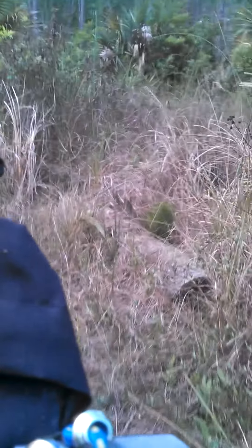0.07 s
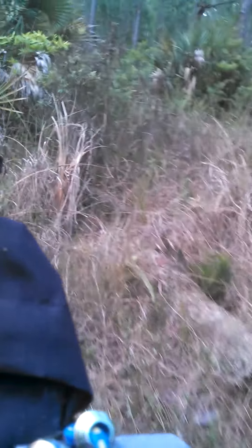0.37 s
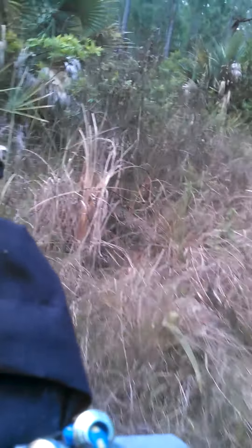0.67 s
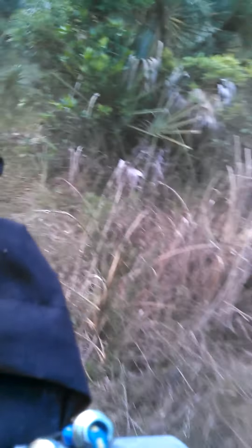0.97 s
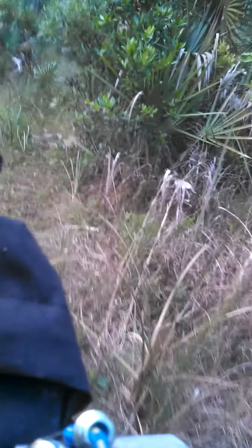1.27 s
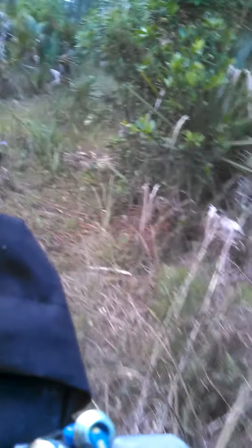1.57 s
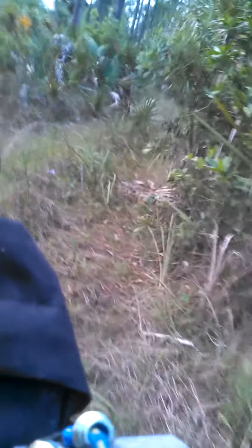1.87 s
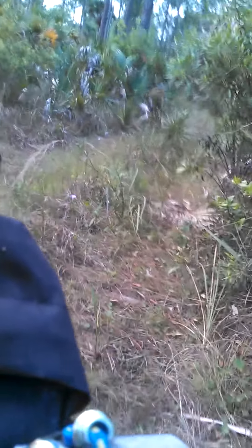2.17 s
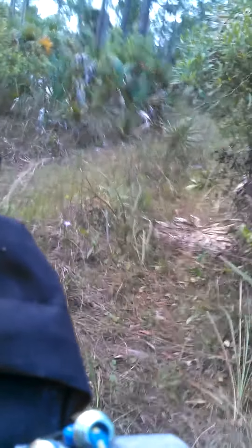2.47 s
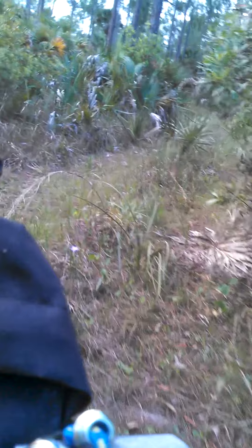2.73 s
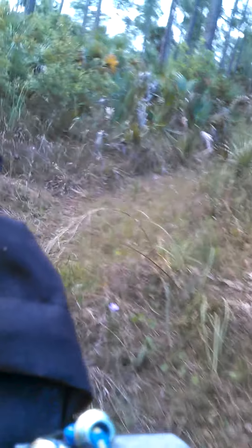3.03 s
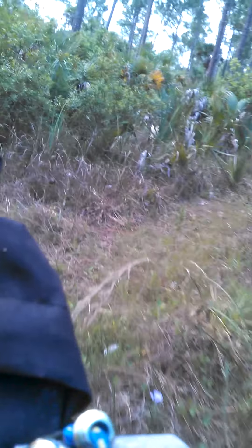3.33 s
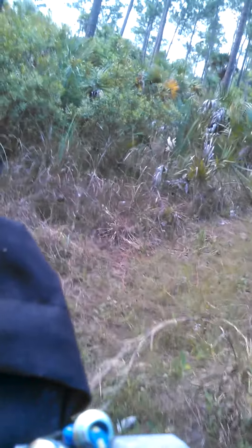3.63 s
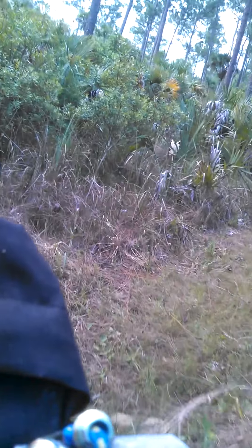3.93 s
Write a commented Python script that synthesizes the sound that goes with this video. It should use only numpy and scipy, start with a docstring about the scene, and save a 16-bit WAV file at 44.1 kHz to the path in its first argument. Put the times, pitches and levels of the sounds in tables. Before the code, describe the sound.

Bicycle freewheel ticking steadily over a bumpy, grassy trail as gusts buffet the microphone.

```python
"""A bicycle coasts along a trail of dry grass, heard from the rider's seat.
From the start the freewheel ticks, stalks swish and snap, the tyres crunch and the recorder whines faintly.
After one second the bike jolts over a bump and a strong gust thumps one of two close microphones;
the recorder turns everything down, then slowly back up. Near two seconds more bumps knock the bike,
which gives a brief hollow groan. It then ticks on to the end through lighter knocks and gusts."""
import sys
import numpy as np
from scipy import signal
from scipy.fft import rfft, irfft
from scipy.io import wavfile
from scipy.ndimage import uniform_filter1d

SR = 44100
rng = np.random.default_rng(int(sys.argv[2]) if len(sys.argv) > 2 else 0)


def wav_record(signal):
    """Record a signal, one row per channel, as 16-bit PCM in the file named by sys.argv[1]."""
    frames = np.transpose(np.atleast_2d(signal))
    bounded = np.clip(frames, -1, 1)
    # unit amplitude maps onto the largest positive 16-bit level
    quanta = np.round(bounded * 32767).astype(np.int16)
    wavfile.write(sys.argv[1], SR, quanta)


N = 176400
T = np.arange(N) / SR


def amp(db):
    """Turn decibels into a number to multiply by."""
    return 10 ** (np.asarray(db) / 20)


def unit(x):
    """Scale a signal to an average power of one."""
    return x / np.sqrt(np.mean(x ** 2))


def curve(rows):
    """Strength over time, joining rows of time_s, level_db."""
    return amp(np.interp(T, *np.array(rows).T))


def swells(rows):
    """Power over time of smooth rises and falls."""
    return sum(amp(db) ** 2 * np.exp(-2 * ((T - s) / (length / 2)) ** 2) for s, length, db in rows)


def colour(x, points):
    """Shape the tone by rows of pitch_hz, level_db; white noise keeps its overall power."""
    hz, db = np.array(points).T
    bin_hz = np.maximum(np.fft.rfftfreq(N, 1 / SR), 1)
    gains = unit(amp(np.interp(np.log(bin_hz), np.log(hz), db)))
    cepstrum = irfft(np.log(gains), N)
    cepstrum[1:N // 2] *= 2  # folded so the filter rings only after a hit, never before
    cepstrum[N // 2 + 1:] = 0
    response = irfft(np.exp(rfft(cepstrum)), N)[:SR // 10]
    return signal.fftconvolve(np.atleast_2d(x), response[None], axes=-1)[:, :N]


def delay(x, s):
    """Make a sound arrive s seconds later."""
    return irfft(rfft(x) * np.exp(-2j * np.pi * np.fft.rfftfreq(N, 1 / SR) * s), N)


def walk(per_s):
    """A wandering line through per_s random values each second."""
    return np.interp(T * per_s, np.arange(N // 100), rng.standard_normal(N // 100))


def grains(per_s, spread_db):
    """Two channels of tiny breaks at shared random moments, uneven in size."""
    happens = rng.random(N) < per_s / SR
    size = happens * amp(spread_db * np.minimum(rng.exponential(size=N), 4))
    return unit(size * rng.standard_normal((2, N)))


def blows(rows, attack_s, decay_s, ring_db, ring_s):
    """Strength over time of a series of hits: quick rise, short crack, weaker ring."""
    out = np.zeros(N)
    for s, db in rows:
        start = max(int(s * SR), 0)
        age = T[:min(SR // 8, N - start)]
        rise = 1 - np.exp(-age / attack_s)
        fall = np.exp(-age / decay_s) + amp(ring_db) * np.exp(-age / ring_s)
        out[start:start + len(age)] += amp(db) * rise * fall
    return out


def patchy(x, spread_db, size):
    """Add brief ringing at random pitches, so that no two contacts sound alike."""
    bins = signal.stft(x, nperseg=size)[2]
    chance = rng.standard_normal(bins.shape[1:])
    across_pitch = uniform_filter1d(chance, size=2, axis=0)
    patches = unit(uniform_filter1d(across_pitch, size=6, axis=1))
    gains = amp(spread_db * np.tanh(patches / 2) * 2)
    return unit(signal.istft(bins * gains)[1][:, :N])


def whine():
    """The recorder's electronics give thin, high tones that flutter a little."""
    # electronic tones: pitch_hz, level_db
    tones = [(12297, -44), (15000, -67)]
    flutter_db = 1.74 * walk(per_s=24.72)
    return amp(flutter_db) * sum(amp(db) * np.sqrt(2) * np.sin(2 * np.pi * hz * T) for hz, db in tones)


def wind():
    """Gusts thump on the right microphone; strong ones shed smaller, brighter whirls of air."""
    # gusts: centre_s, length_s, level_db
    gusts = [(0.128, 0.1, -22.5), (0.317, 0.018, -15), (0.541, 0.053, -12.5), (0.6, 0.039, -12.5),
             (0.694, 0.012, -15.5), (0.756, 0.044, -10), (.808, 0.051, -11.5), (.846, 0.027, -11.5),
             (0.892, 0.025, -6.5), (0.977, 0.032, -4.5), (1.025, 0.026, 8), (1.222, 0.059, -11),
             (1.283, 0.021, -6.5), (1.365, 0.045, -1), (1.505, 0.019, -6), (1.568, 0.068, -8),
             (1.692, 0.042, -8.5), (1.806, 0.011, -0.5), (1.89, 0.026, -12), (2.085, 0.071, -5.5),
             (2.18, 0.043, -2), (2.24, 0.043, -5.5), (2.385, 0.072, -7.5), (2.457, 0.019, -5),
             (2.54, 0.056, -11), (2.615, 0.033, -7), (2.731, 0.046, -10), (2.844, 0.082, -10),
             (2.915, 0.026, -9), (2.99, 0.037, -12), (3.042, 0.036, -6.5), (3.178, 0.02, -6),
             (3.29, 0.099, -14.5), (3.362, 0.042, -11), (3.467, 0.098, -11.5), (3.622, 0.022, -13.5),
             (3.694, 0.025, -10.5), (3.995, 0.015, -12.5)]
    # steady flow under the gusts: time_s, level_db
    airflow = [(0, -32.5), (.42, -39), (.95, -19.5), (1.15, -21), (1.75, -28), (2.03, -18.5), (2.3, -24.5),
               (2.68, -32), (3.0, -25), (3.45, -32.5), (4, -28)]
    # tone of the deep rumble: pitch_hz, level_db
    rumble_tone = [(25, -24.5), (50, -0.5), (70, 3.5), (110, -0.5), (165, -9), (230, -20), (330, -36.5),
                   (600, -51.5), (1500, -75)]
    # tone of the small whirls: pitch_hz, level_db
    whirl_tone = [(60, -30.5), (150, 7.5), (220, 4), (320, -7.5), (500, -19.5), (1000, -34.5), (3000, -45)]
    force = np.sqrt((amp(5.5) * curve(airflow)) ** 2 + swells(gusts))
    rumble = colour(rng.standard_normal(N), rumble_tone)[0]
    rumble = unit(rumble / np.sqrt(uniform_filter1d(rumble ** 2, size=600) + .02))  # even out its level
    whirls = colour(rng.standard_normal(N), whirl_tone)[0]
    air = amp(-1) * force * rumble + amp(-9) * force ** 1.69 * whirls
    low_cut = signal.butter(2, 36, "high", fs=SR, output="sos")
    return np.array([np.zeros(N), signal.sosfilt(low_cut, air)])


def grass():
    """Dry blades brush past in a fine hiss with bunches of crackles; now and then a stalk snaps."""
    # grass brushing wheels and frame: time_s, level_db
    brushing = [(0, -36.5), (.09, -42.5), (.13, -31), (.17, -42), (.33, -40.5), (.46, -35), (.57, -42),
                (.7, -44.5), (.8, -41.5), (.88, -39.5), (.94, -34.5), (1.02, -38.5), (1.3, -44.5),
                (1.65, -37), (1.8, -41), (1.98, -33.5), (2.135, -36.5), (2.17, -41), (2.3, -39),
                (2.52, -44.5), (2.8, -46), (3.1, -47), (3.35, -40), (3.74, -40), (3.87, -36.5), (4, -40.5)]
    # tone of the brushing: pitch_hz, level_db
    swish_tone = [(300, -10), (1000, -5.5), (2000, -2), (3600, 1.5), (4800, -1), (6800, -1.5), (8400, 3.5),
                  (10000, 1.5), (12000, -1), (15500, -6)]
    # stalks and twigs snapping: start_s, level_db
    snaps = [(0.122, -34), (0.136, -34.5), (0.503, -28), (0.7283, -32), (0.7845, -20), (0.844, -46),
             (1.0141, -19.5), (1.0744, -30), (1.157, -25.5), (1.5774, -25), (1.6502, -21.5), (1.8473, -23),
             (1.9794, -25), (2.1144, -25.5), (2.3243, -28), (2.4237, -27), (2.6313, -26), (3.1465, -24),
             (3.273, -44)]
    # tone of a snap: pitch_hz, level_db
    snap_tone = [(400, 7), (2400, 2), (3400, 12), (4700, 6.5), (7000, -7.5), (15000, -23)]
    bunch_db, crackle_decay_s = 5, 0.0021
    breaks = np.abs(grains(per_s=240, spread_db=-1)[0]) * amp(bunch_db * np.tanh(walk(per_s=20)))
    fading_breaks = signal.lfilter([1], [1, -np.exp(-1 / (crackle_decay_s * SR))], breaks)
    crackle = fading_breaks * rng.standard_normal((2, N))
    rustle = unit(rng.standard_normal((2, N)) + .75 * unit(crackle))
    swish = patchy(rustle, spread_db=3, size=256) * curve(brushing) * amp(2 * walk(per_s=29.91))
    snapping = blows(snaps, attack_s=0.00027, decay_s=0.0014, ring_db=-17.5, ring_s=0.027)
    return colour(swish, swish_tone) + amp(1) * colour(snapping * rng.standard_normal((2, N)), snap_tone)


def groan():
    """A brief hollow tone, perhaps a part rubbing as the bike rebounds; it rises a little and sinks."""
    # base pitch, heard only through its overtones: time_s, pitch_hz
    glide = [(2.14, 112), (2.22, 125.5), (2.39, 108.5)]
    # overtones: pitch_multiple, level_db
    overtones = [(5, 2), (6, -3), (8, -22)]
    # the groan's rise and fall: centre_s, length_s, level_db
    swell = [(2.25, 0.15, -39.5)]
    phase = 2 * np.pi * np.cumsum(np.interp(T, *np.array(glide).T)) / SR
    tone = sum(amp(db) * np.sin(round(multiple) * phase) for multiple, db in overtones)
    return np.array([tone * np.sqrt(swells(swell)), np.zeros(N)])


def tyres():
    """The tread crushes dry bits on the trail in uneven spurts."""
    # tyres pressing on the ground: time_s, level_db
    pressing = [(0, -39.5), (.4, -38.5), (.44, -27.5), (.48, -35), (.56, -40), (.73, -42.5), (.8, -38),
                (1.02, -35), (1.1, -35), (1.56, -43.5), (1.67, -27), (1.77, -42), (1.85, -29.5),
                (1.91, -35), (2.0, -28), (2.22, -33), (2.4, -34), (2.56, -39.5), (2.69, -38.5),
                (2.725, -34), (2.8, -47), (3.07, -37.5), (3.3, -45), (3.6, -41.5), (3.85, -37),
                (3.95, -33.5), (4, -60.5)]
    # tone of the crunch: pitch_hz, level_db
    crunch_tone = [(100, 0.5), (300, 6), (500, 4.5), (750, -4), (1100, -8), (1500, -19.5), (2200, -8),
                   (3600, -38), (5000, -56), (12000, -74)]
    crunch = patchy(grains(per_s=2500, spread_db=2.5), spread_db=4.5, size=512)
    spurts = amp(4.4 * np.tanh(walk(per_s=55)))
    return amp(-2.5) * colour(crunch * curve(pressing) * spurts, crunch_tone)


def bumps():
    """Bumps knock the bike, each with its own ring."""
    # knocks: start_s, level_db
    knocks = [(0.427, -27.5), (0.44, -24), (0.45, -20.5), (0.504, -21.5), (0.895, -29.5), (0.937, -35),
              (1.012, -33), (1.023, -14), (1.072, -20.5), (1.169, -22), (1.492, -34), (1.821, -28),
              (1.994, -17.5), (2.046, -20), (2.099, -17.5), (2.476, -26), (2.599, -32), (2.711, -24.5),
              (2.726, -24), (3.146, -25), (3.191, -34.5), (3.521, -28.5), (3.607, -28.5), (3.9455, -21.5)]
    # tone of a knock: pitch_hz, level_db
    knock_tone = [(100, 0), (300, 7), (600, 0.5), (1000, -9.5), (1600, -12), (2500, -18), (5000, -22),
                  (12000, -55)]
    hits = blows(knocks, attack_s=0.00078, decay_s=0.0039, ring_db=-13, ring_s=0.017)
    ringing = patchy(rng.standard_normal((2, N)), spread_db=4.5, size=512)
    return amp(2) * colour(hits * ringing, knock_tone)


def freewheel():
    """Small catches in the hub drop into a toothed ring about fourteen times a second."""
    # clicks of the catches: start_s, level_db
    ticks = [(0.021, -28.5), (0.094, -31), (0.163, -31), (0.24, -36), (0.3097, -32), (0.379, -34),
             (0.449, -26), (0.5222, -36), (0.594, -27.5), (0.6617, -28.5), (0.7265, -28), (0.792, -27),
             (0.8578, -28), (0.922, -24), (0.9878, -27.5), (1.062, -18), (1.1314, -22.5), (1.2024, -24.5),
             (1.277, -29.5), (1.3472, -25.5), (1.4225, -25.5), (1.4795, -30), (1.5453, -29),
             (1.6175, -25.5), (1.6853, -26.5), (1.7476, -23.5), (1.8148, -22.5), (1.8813, -23.5),
             (1.96, -22), (2.0115, -28), (2.068, -26.5), (2.124, -21.5), (2.2077, -26.5), (2.2747, -38),
             (2.3471, -29.5), (2.412, -31), (2.4862, -26.5), (2.5496, -31.5), (2.628, -25), (2.699, -27),
             (2.7682, -27.5), (2.836, -27.5), (2.902, -28.5), (2.9714, -31.5), (3.037, -27), (3.1043, -33),
             (3.1755, -36), (3.243, -32), (3.3109, -36), (3.3805, -32), (3.452, -30), (3.528, -34.5),
             (3.6055, -26.5), (3.694, -27.5), (3.778, -29), (3.8613, -28), (3.9459, -27.5)]
    # tone of a click: pitch_hz, level_db
    tick_tone = [(800, -0.5), (3000, -10.5), (5000, -5.5), (6700, 2), (8500, 1.5), (10500, 3),
                 (12500, -6.5), (15500, -7.5)]
    hits = blows(ticks, attack_s=0.00059, decay_s=0.0025, ring_db=-17.5, ring_s=0.023)
    ringing = patchy(rng.standard_normal((2, N)), spread_db=4, size=256)
    return amp(0.5) * colour(hits * ringing, tick_tone)


def from_below(x):
    """Sound from below reaches the right microphone first; a scattered part falls on the right only."""
    direct, scattered = x
    return np.array([delay(direct, s=0.00014), direct + amp(-0.5) * scattered])


def microphones(pair, cancel):
    """Each side takes away a delayed share (cancel) of the other, which makes the sound wider."""
    travel_s = 0.0003637  # from one microphone to the other
    return pair - cancel * delay(pair[::-1], travel_s)


def scene():
    """Bike, grass and wind meet at the two microphones."""
    bike_and_grass = freewheel() + grass() + from_below(tyres() + bumps() + groan())
    ride = microphones(bike_and_grass, cancel=1) + whine()
    balance = amp([[-0.86], [0]])  # slightly weaker on the left
    return ride * balance + microphones(wind(), cancel=0.77)  # deep bass cancels less


def record(dry):
    """The recorder turns down at once for a loud gust, creeps back up and cuts the highest treble."""
    limit_db, recovery_db_per_s, top_hz = -8, 8.5, 15450
    power = uniform_filter1d(np.mean(dry ** 2, axis=0), size=900)
    excess_db = np.maximum(10 * np.log10(np.maximum(power, 1e-12)) - limit_db, 0)
    recovery_db = recovery_db_per_s * T
    gain = amp(recovery_db - np.maximum.accumulate(excess_db + recovery_db))
    high_cut = signal.ellip(8, .2, 80, top_hz, fs=SR, output="sos")
    return signal.sosfilt(high_cut, np.clip(dry * gain, -1, 1))


dry = scene()
out = record(dry)
wav_record(out)
```